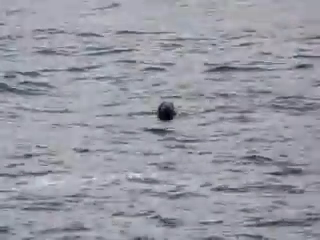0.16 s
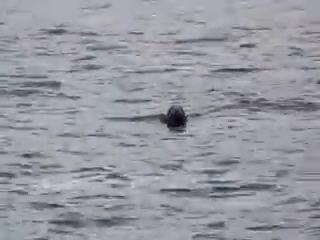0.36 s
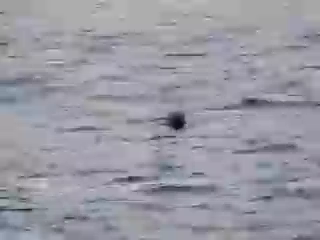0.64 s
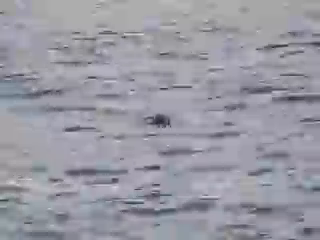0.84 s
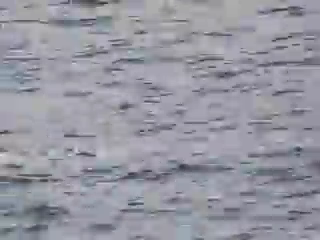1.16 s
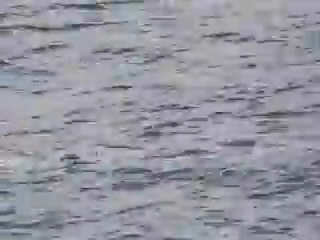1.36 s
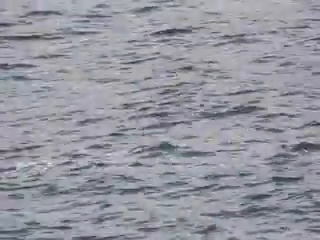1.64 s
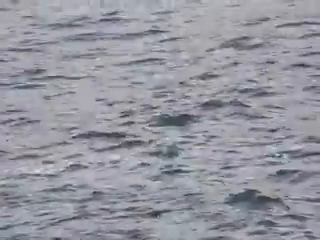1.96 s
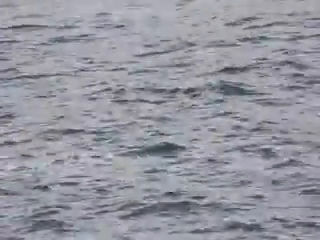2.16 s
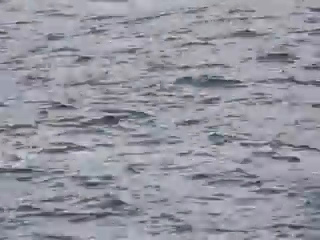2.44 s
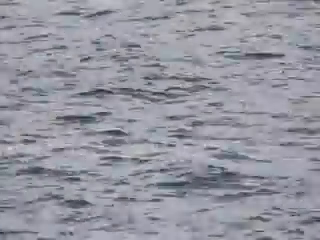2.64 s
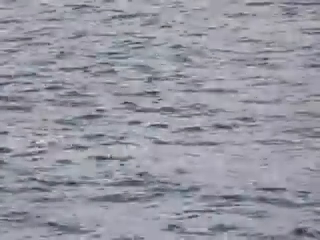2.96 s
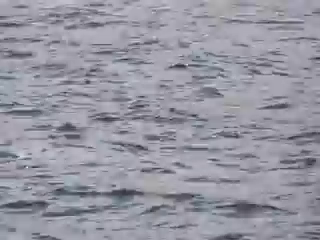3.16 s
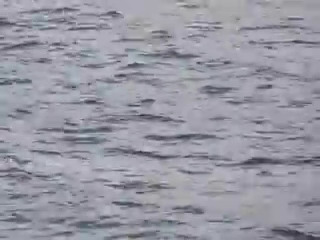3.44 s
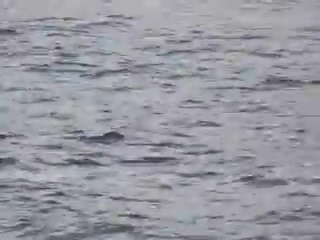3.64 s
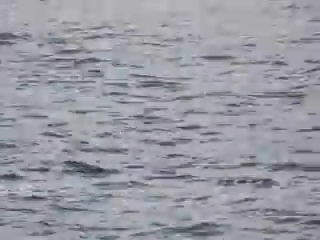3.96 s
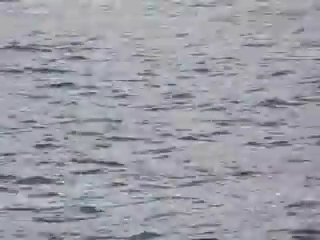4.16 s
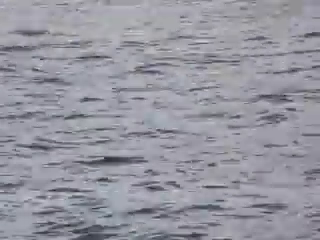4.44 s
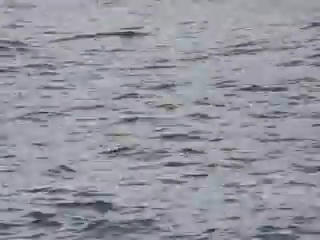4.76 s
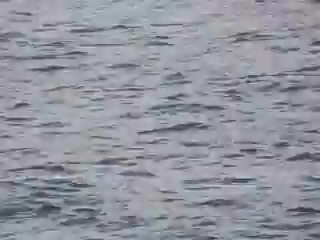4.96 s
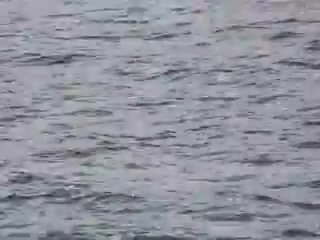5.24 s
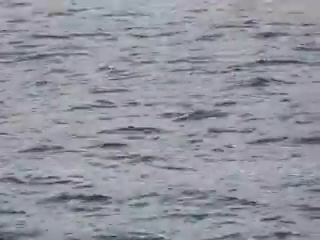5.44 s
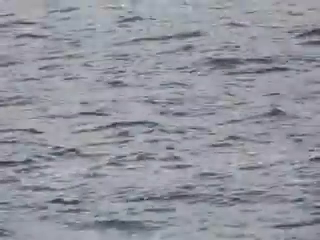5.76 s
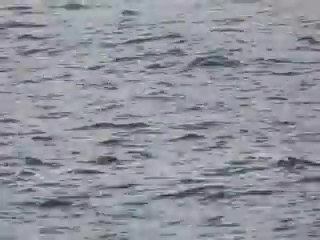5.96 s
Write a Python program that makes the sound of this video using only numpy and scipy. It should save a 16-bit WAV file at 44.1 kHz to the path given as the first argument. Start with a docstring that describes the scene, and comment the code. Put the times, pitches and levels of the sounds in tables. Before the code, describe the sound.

Countless seagulls call over one another at a windy shore, with low wind rumble and harsh buffeting bursts overloading the microphone.

```python
"""Choppy, rocky shore: a gull colony yelps, shrieks, mews and squawks over a distant chorus, in gusty wind.
Near calls are harmonic stacks on arched, sagging or straight pitch glides; all but squawks have a bounce.
The chorus is 420 overlapping yelps; coloured noise is the wash of small waves and blur of the farthest gulls.
Wind is shaped noise (rumble, flutter) plus pressure pulses and snaps; its hardest peaks overload the microphone.
Short noise bursts make a few faint ticks close by; a faint electronic whine sits on top."""
import sys
import numpy as np
from scipy import signal
from scipy.fft import rfft, irfft, next_fast_len
from scipy.io import wavfile
from scipy.ndimage import uniform_filter1d, map_coordinates

SR = 44100
rng = np.random.default_rng(int(sys.argv[2]) if len(sys.argv) > 2 else 0)


def waveform_to_disk(signal):
    """Save audio, clipped to [-1, 1], as 16-bit WAV at the path in sys.argv[1]."""
    frames = np.transpose(np.atleast_2d(signal))
    scaled = np.clip(frames, -1, 1) * 32767
    samples = np.round(scaled).astype(np.int16)
    wavfile.write(sys.argv[1], SR, samples)


N = 268965  # samples


def amp(db):
    """Decibels to gain."""
    return 10 ** (np.asarray(db) / 20)


def unit(x):
    """Scale to rms 1."""
    return x / np.sqrt(np.mean(x ** 2) + 1e-20)


def along(points, hz):
    """Interpolate (Hz, value) points on a log frequency axis."""
    point_hz, values = np.transpose(points)
    return np.interp(np.log(hz + 1), np.log(point_hz + 1), values)


def curves(rows):
    """One value per sample for each column after the time."""
    times_s, *columns = np.transpose(rows)
    return [np.interp(np.arange(N) / SR, times_s, column) for column in columns]


def wobble(rate_hz, size=N):
    """Smooth random curve through rate_hz random knots a second."""
    knots = rng.standard_normal(int(size * rate_hz / SR) + 4)
    return map_coordinates(knots, [np.arange(size) * rate_hz / SR])


def filtered(x, response):
    """Apply a gain that is a function of frequency."""
    size = next_fast_len(N + SR // 2)
    return irfft(rfft(x, size) * response(np.fft.rfftfreq(size, 1 / SR)), size)[:N]


def noise(spectrum):
    """Coloured noise of rms 1."""
    return unit(filtered(rng.standard_normal(N), lambda hz: amp(along(spectrum, hz))))


def evened(x, span_s):
    """Divide out the running rms over span_s, so strength holds steady."""
    power = uniform_filter1d(x ** 2, max(int(span_s * SR), 8))
    return x / np.sqrt(np.abs(power) + 1e-6)


def add(track, start_s, sound):
    """Mix a sound into the track in place, cropped at both ends."""
    start = int(start_s * SR)
    part = sound[max(-start, 0):max(N - start, 0)]
    track[max(start, 0):][:len(part)] += part


def cry(length_s, start_hz, middle_hz, end_hz, harmonics_db, jitter, flutter_db):
    """One syrinx note on a quadratic pitch glide; pitch trembles, turbulent air shakes each harmonic."""
    u = np.linspace(0, 1, max(int(length_s * SR), 64))
    glide_hz = np.polyval(np.polyfit([0, .5, 1], [start_hz, middle_hz, end_hz], 2), u)
    phase = 2 * np.pi * np.cumsum(glide_hz * (1 + jitter * wobble(258, len(u)))) / SR
    swell = np.abs(np.sin(np.pi * u)) ** 0.16
    partials = [amp(db + flutter_db * wobble(70, len(u))) * np.sin(k * phase)
                for k, db in enumerate(harmonics_db, 1)]
    return np.sqrt(2) * swell * sum(partials)


BOUNCE_MEAN_S, BOUNCE_DB = .012, -10


def note(length_s, hz, fall, arch, harmonics_db):
    """Near gull's note plus one bounce off water or rock, which beats against the gliding pitch."""
    start_hz, end_hz = hz * (1 - arch + fall / 2), hz * (1 - arch - fall / 2)
    direct = cry(length_s, start_hz, hz, end_hz, harmonics_db, jitter=.009, flutter_db=3)
    lag = int(SR * BOUNCE_MEAN_S * (.5 + rng.random()))
    return np.pad(direct, (0, lag)) + amp(BOUNCE_DB) * np.pad(direct, (lag, 0))


CALL_TRIM_DB = 1  # on yelps, long calls and shrieks
UPPER_STEP_DB = -22.5  # harmonics 4 and 5, each relative to the one below


def harmonic_calls(calls, arch):
    """Syrinx notes with three given harmonics and two weaker ones above."""
    out = np.zeros(N)
    for start_s, length_s, hz, fall, *levels_db in calls:
        third_db = levels_db[-1]
        levels_db = np.r_[levels_db, third_db + UPPER_STEP_DB, third_db + 2 * UPPER_STEP_DB]
        add(out, start_s, note(length_s, hz, fall, arch, levels_db + CALL_TRIM_DB))
    return out


# short, mostly falling yelps, plus the low tone of the hoarse squawk at 2.83 s
# and one high falling mew with a strong second harmonic at 4.6 s; levels before trims:
# (time [s], length [s], mid pitch [Hz], fall [share of pitch], harmonic 1 [dB], 2 [dB], 3 [dB])
YELP_CALLS = [(0.01, 0.055, 1208, 0.097, -38, -40, -48.0), (0.1, 0.054, 1445, 0.16, -56, -36, -43),
              (0.24, 0.035, 1214, 0.096, -50.0, -36.5, -44),
              (0.245, 0.04, 1570, 0.055, -59.0, -38.5, -59.0),
              (0.315, 0.047, 1175, 0.032, -34.0, -44.5, -53.0), (0.315, 0.045, 1384, 0.08, -43, -48, -43),
              (0.355, 0.035, 1483, 0.076, -38, -38, -50.5), (0.398, 0.043, 1430, 0.12, -53.0, -34.5, -44),
              (0.485, 0.062, 1270, 0.13, -48, -35.5, -43), (0.535, 0.06, 1357, 0.061, -37.5, -38, -51),
              (0.645, 0.04, 1215, 0.1, -34.5, -44, -50), (0.7, 0.05, 1422, 0.16, -48, -39, -45),
              (0.845, 0.053, 1339, 0.116, -33, -44, -47), (0.93, 0.079, 1227, 0.092, -38, -43, -41),
              (1.02, 0.049, 1415, 0.088, -37, -34, -42), (1.035, 0.037, 1168, 0.074, -37, -47, -40),
              (1.185, 0.064, 1348, 0.085, -38.5, -40, -47), (1.275, 0.028, 1140, 0.097, -35.5, -58, -55.5),
              (1.395, 0.06, 1280, 0.02, -45, -43, -43), (1.41, 0.052, 1493, 0.03, -46, -36, -51),
              (1.49, 0.029, 1246, 0.15, -31.5, -39, -43), (1.61, 0.035, 1216, 0.07, -46, -44, -46),
              (1.665, 0.082, 1256, 0.07, -37, -40, -50), (1.735, 0.05, 1350, 0.064, -37.0, -44, -54.0),
              (1.775, 0.059, 1193, 0.065, -37.5, -41, -44), (1.82, 0.025, 1520, 0.073, -45.5, -37.5, -60),
              (1.98, 0.067, 1360, 0.074, -38, -37.5, -54.0), (2.085, 0.068, 1266, 0.17, -31, -46, -42),
              (2.255, 0.064, 1370, 0.14, -48.5, -37.0, -51), (2.3, 0.085, 1334, 0.086, -36, -48, -46),
              (2.4, 0.056, 1328, 0.082, -38.0, -39, -43.5), (2.455, 0.052, 1206, 0.106, -35.5, -46, -48.0),
              (2.535, 0.052, 1410, 0.15, -45, -37.0, -57.5), (2.705, 0.059, 1360, 0.05, -36.5, -40, -42.0),
              (2.83, 0.062, 732, 0.28, -35, -47, -46.0), (2.865, 0.035, 1420, 0.035, -44, -48, -40),
              (2.97, 0.055, 1432, 0.12, -37.5, -36.0, -49.0), (3.095, 0.07, 1333, 0.14, -38, -37, -46),
              (3.11, 0.089, 1372, 0.06, -42, -39.0, -40.0), (3.205, 0.059, 1523, 0.091, -58, -37, -56),
              (3.31, 0.05, 1374, 0.022, -39, -37, -49.5), (3.375, 0.053, 1394, 0.13, -36.5, -31, -42),
              (3.425, 0.077, 1380, 0.092, -41.5, -35, -39.5), (3.485, 0.06, 1401, 0.089, -41.5, -36.0, -46),
              (3.5, 0.056, 1283, 0.12, -32.5, -41, -36), (3.53, 0.033, 1087, 0.089, -41, -37.0, -41.5),
              (3.545, 0.045, 1365, 0.055, -44, -46, -39), (3.605, 0.04, 1583, 0.022, -52, -44, -56.5),
              (3.655, 0.065, 1377, 0.144, -42.0, -33, -51.0), (3.7, 0.085, 1390, 0.07, -38, -39, -41),
              (3.945, 0.076, 1354, 0.131, -41, -32, -40.5), (3.995, 0.043, 1260, 0.09, -37, -41, -47.0),
              (4.055, 0.08, 1470, -0.014, -46, -33, -57.5), (4.155, 0.056, 1460, 0.005, -39, -36.5, -59.5),
              (4.25, 0.046, 1504, 0.005, -55.5, -35.5, -47),
              (4.265, 0.047, 1360, 0.066, -38.5, -31.5, -37.5), (4.345, 0.037, 1298, 0.023, -31, -37, -40),
              (4.475, 0.052, 1578, 0.096, -57, -38, -63), (4.525, 0.05, 1374, 0.062, -39, -42, -40),
              (4.605, 0.11, 2115, 0.115, -40.5, -42, -62), (4.645, 0.09, 1322, 0.05, -38, -38, -44),
              (4.84, 0.06, 1435, 0.153, -43.0, -35.5, -45.0), (4.89, 0.079, 1334, 0.065, -46, -36.5, -48),
              (5.035, 0.06, 1598, 0.094, -57, -38, -62), (5.05, 0.033, 1410, 0.132, -49, -36, -40.5),
              (5.08, 0.037, 1247, 0.076, -34, -49, -58.0), (5.355, 0.05, 1489, 0.042, -41.5, -34.5, -52.0),
              (5.42, 0.055, 1370, 0.085, -39, -36.5, -42), (5.555, 0.047, 1492, 0.044, -39.5, -35, -44),
              (5.62, 0.05, 1334, 0.018, -36, -43, -41), (5.74, 0.07, 1370, 0.058, -37, -35.5, -43),
              (5.785, 0.068, 1276, 0.15, -35.5, -41, -38.5), (5.97, 0.08, 1327, 0.098, -36.5, -36, -38.5)]
CALL_ARCH = .014  # mid-note bulge above a straight glide [share of pitch]; also for mews


def yelps():
    """Syrinx notes whose pitch bulges slightly midway: yelps, one low squawk tone and one high mew."""
    return harmonic_calls(YELP_CALLS, CALL_ARCH)


# arched long-call notes; levels before trims:
# (time [s], length [s], mid pitch [Hz], fall [share of pitch], harmonic 1 [dB], 2 [dB], 3 [dB])
LONG_CALL_NOTES = [(0.91, 0.078, 1590, 0.064, -49, -40.5, -49),
                   (1.255, 0.066, 1557, 0.047, -49, -36.5, -56), (1.4, 0.12, 1581, 0.16, -45.0, -34, -59),
                   (1.51, 0.08, 1608, 0.061, -58.0, -36.5, -46),
                   (2.16, 0.052, 1620, 0.00024, -44.0, -37.0, -60.5),
                   (2.58, 0.11, 1629, 0.00084, -40.0, -46, -50), (3.75, 0.11, 1560, 0.12, -56, -34.5, -49),
                   (4.06, 0.1, 1595, 0.04, -37.5, -37, -56.0), (4.87, 0.11, 1566, -0.005, -39, -38.5, -57),
                   (5.19, 0.088, 1585, -0.028, -39.5, -47.0, -56),
                   (5.49, 0.089, 1556, 0.048, -40, -35, -52),
                   (5.835, 0.075, 1565, 0.053, -41.5, -34.5, -60)]
LONG_CALL_ARCH = 0.045  # [share of pitch]


def long_calls():
    """Series of syrinx notes that rise to mid-note and fall again."""
    return harmonic_calls(LONG_CALL_NOTES, LONG_CALL_ARCH)


# shrill shrieks; levels before trims:
# (time [s], length [s], mid pitch [Hz], fall [share of pitch], level [dB])
SHRIEK_CALLS = [(0.021, 0.028, 1234, 0.098, -42), (0.076, 0.073, 1148, 0.145, -36),
                (0.373, 0.031, 1099, 0.096, -36.5), (0.783, 0.048, 1163, 0.098, -34.5),
                (1.05, 0.069, 1166, 0.013, -38.5), (1.47, 0.031, 1123, 0.002, -40),
                (1.514, 0.024, 1116, 0.054, -34), (1.595, 0.072, 1143, 0.115, -34.5),
                (2.65, 0.024, 1164, 0.056, -37), (2.894, 0.035, 1139, 0.144, -31),
                (3.173, 0.042, 1078, 0.12, -33), (3.416, 0.046, 1091, 0.16, -30),
                (4.058, 0.03, 1150, 0.11, -32), (4.097, 0.022, 1111, 0.094, -31.5),
                (4.341, 0.075, 1231, 0.137, -36), (4.694, 0.028, 1121, 0.048, -33.5),
                (4.755, 0.051, 1174, 0.064, -34), (4.975, 0.04, 1154, 0.125, -35.5),
                (5.08, 0.028, 1163, 0.018, -38), (5.288, 0.038, 1144, 0.052, -32),
                (5.46, 0.036, 1164, 0.086, -35), (5.598, 0.049, 1124, 0.12, -31)]
# harmonics 1-4, the third carries the cry: (level [dB re shriek level])
SHRIEK_PARTIALS_DB = [-8.5, -15, 0.5, -18.5]
SHRIEK_SCOOP = 0.012  # mid-note sag below a straight glide [share of pitch]


def shrieks():
    """Third-harmonic-heavy notes on a pitch glide that sags midway."""
    out = np.zeros(N)
    for start_s, length_s, hz, fall, level_db in SHRIEK_CALLS:
        levels_db = level_db + CALL_TRIM_DB + np.array(SHRIEK_PARTIALS_DB)
        add(out, start_s, note(length_s, hz, fall, -SHRIEK_SCOOP, levels_db))
    return out


# high, nearly level mews and one drawn-out wail; levels before trims:
# (time [s], length [s], mid pitch [Hz], fall [share of pitch], level [dB])
MEW_CALLS = [(0.0, 0.15, 1760, 0.044, -44.5), (0.277, 0.16, 1813, 0.044, -44.5),
             (0.57, 0.13, 1810, 0.058, -46.5), (0.84, 0.145, 1830, 0.059, -45.0),
             (1.123, 0.125, 1840, 0.063, -45), (1.382, 0.13, 2070, 0.009, -43),
             (2.15, 0.053, 1750, 0.066, -44), (2.479, 0.4, 1912, -0.058, -43.0),
             (2.764, 0.1, 1595, -0.017, -38), (3.105, 0.17, 2022, 0.05, -43),
             (3.388, 0.11, 2080, 0.06, -43), (3.82, 0.059, 2014, 0.039, -43),
             (4.019, 0.16, 2058, -0.034, -41.5), (4.292, 0.11, 2072, 0.033, -41.5)]
MEW_TRIM_DB, MEW_SECOND_HARMONIC_DB = 1.2, -8.5  # second harmonic re first


def mews():
    """Nearly pure tones: a fundamental and a weaker second harmonic."""
    out = np.zeros(N)
    for start_s, length_s, hz, fall, level_db in MEW_CALLS:
        first_db = level_db + MEW_TRIM_DB
        levels_db = [first_db, first_db + MEW_SECOND_HARMONIC_DB]
        add(out, start_s, note(length_s, hz, fall, CALL_ARCH, levels_db))
    return out


# hoarse squawks, far below the usual pitch; levels before formant and trim:
# (time [s], length [s], start pitch [Hz], end pitch [Hz], level [dB])
SQUAWK_CALLS = [(1.398, 0.13, 298, 270.4, -51), (2.809, 0.078, 277.2, 249, -35)]
# resonance of the wide-open bill: (frequency [Hz], gain [dB])
OPEN_BILL = [(300, -17.5), (700, -9), (1300, -6.5), (2000, -8), (2700, -15.5), (3200, -2), (3600, 4.5),
             (3950, -5), (4400, -19), (5500, -32.5)]


def squawks(harmonic_count=20):
    """Syrinx drops into a slow rattle whose close harmonics fill the bill resonance."""
    out = np.zeros(N)
    for start_s, length_s, start_hz, end_hz, level_db in SQUAWK_CALLS:
        middle_hz = (start_hz + end_hz) / 2
        levels_db = level_db + along(OPEN_BILL, middle_hz * np.arange(1, harmonic_count + 1))
        squawk = cry(length_s, start_hz, middle_hz, end_hz, levels_db, jitter=.018, flutter_db=4.5)
        add(out, start_s, squawk)
    return out


# echo off the shore: (frequency [Hz], t60 [s])
SHORE_DECAY = [(500, 0.91), (3000, 1), (8000, 0.36)]


def shore(x):
    """Diffuse echo from rocks and water: unit-energy noise tail, treble dies first."""
    hz, t, bins = signal.stft(rng.standard_normal(SR), SR, nperseg=256)
    decay = amp(-60 * t / along(SHORE_DECAY, hz)[:, None])
    tail = signal.istft(bins * decay, SR, nperseg=256)[1]
    return signal.fftconvolve(x, tail / np.linalg.norm(tail))[:N]


# far gull's throat resonance: (frequency [Hz], gain [dB])
FAR_THROAT = [(900, -6), (1100, 3.5), (1300, 5), (1450, 1.5), (1700, -18.5), (2050, 4.5), (2250, -7.5),
              (2400, -3.5), (2700, 7), (3200, 5), (3700, -4), (4150, 0.5), (4500, -12), (5500, -28),
              (8000, -38.5)]


def far_gulls(count=420):
    """Overlapping four-harmonic yelps, each dropping in pitch."""
    out = np.zeros(N)
    starts_s = (np.arange(count) + rng.random(count)) / count * (N / SR + .1) - .1
    traits = rng.standard_normal((count, 4))
    for start_s, (pitch, stretch, drop, loudness) in zip(starts_s, traits):
        hz = 1305 * np.exp(.112 * pitch)
        levels_db = along(FAR_THROAT, hz * np.arange(1, 5)) + 1.2 * loudness
        length_s = .07 * np.exp(.25 * stretch)
        fall = np.exp(-.07 + .035 * drop)  # end pitch / mid pitch
        yelp = cry(length_s, hz * fall ** (-1 / 2), hz, hz * fall, levels_db, jitter=.009, flutter_db=3)
        add(out, start_s, yelp)
    return out


# distant chorus; levels before trims: (time [s], fundamentals [dB], overtones [dB])
CHORUS_LEVELS = [(0, -33, -32.5), (.4, -33, -29.5), (1.1, -33.5, -34), (1.9, -34, -31.5), (2.6, -31.5, -31),
                 (3.5, -31, -29), (4.6, -31.5, -28.5), (5.4, -32, -29), (6.1, -32.5, -32)]
CHORUS_TRIM_DB, OVERTONE_TRIM_DB = -1.46, -3


def colony():
    """Far chorus blurred by the shore, split near 1900 Hz into bands that follow their own levels."""
    voices = far_gulls()
    voices = voices + amp(-5.5) * shore(voices)
    fundamentals = filtered(voices, lambda hz: 1 / (1 + (hz / 1900) ** 12))
    overtones = voices - fundamentals
    level_db, overtone_db = curves(CHORUS_LEVELS)
    low = amp(level_db + CHORUS_TRIM_DB) * evened(fundamentals, 0.13)
    return low + amp(overtone_db + OVERTONE_TRIM_DB) * evened(overtones, 0.11)


GUST_ATTACK_S, GUST_RELEASE_S, GUST_SAG_DB_PER_S = 0.016, 0.013, 4


def gust(start_s, length_s):
    """Gust envelope: quick linear rise, slow sag, exponential release."""
    t = np.maximum(np.arange(N) / SR - start_s, 0)
    rise = np.minimum(t / GUST_ATTACK_S, 1)
    release = np.exp(-np.maximum(t - length_s, 0) / GUST_RELEASE_S)
    return rise * amp(-GUST_SAG_DB_PER_S * t) * release


# wind between gusts, before trims: (time [s], rumble strength [dB])
STEADY_WIND = [(0, -19), (.9, -19.5), (1.75, -13.5), (2.6, -19.5), (3.5, -19), (4.35, -20), (5.2, -14.5),
               (6.1, -13.5)]
BREEZE_FLUTTER_DB = -8.5  # re breeze rumble
# gusts, before trims: (time [s], length [s], rumble [dB], flutter [dB])
WIND_GUSTS = [(0.083, 0.19, -14.5, -18.5), (0.296, 0.057, -20, -18), (0.481, 0.1, -14, -20.5),
              (0.773, 0.076, -26, -18.5), (1.307, 0.28, -10.5, -14), (1.648, 0.087, -30, -14.5),
              (1.798, 0.15, -21, -15), (2.044, 0.23, -12, -14.5), (2.237, 0.16, -10.5, -22.5),
              (2.586, 0.038, -8.5, -20.5), (2.921, 0.098, -22, -17.5), (3.12, 0.068, -11.5, -12.5),
              (3.204, 0.057, -12, -13), (3.361, 0.14, -14.5, -21.5), (4.25, 0.28, -18, -23),
              (4.528, 0.077, -15, -14.5), (4.728, 0.052, -20, -18.5), (5.011, 0.21, -13.5, -15.5),
              (5.27, 0.085, -12, -9.5), (5.348, 0.071, -11, -14.5), (5.574, 0.038, -14, -12.5),
              (5.704, 0.29, -28, -16.5), (5.882, 0.063, -8, -10.5), (5.999, 0.087, -13, -14.5)]


def wind_strength():
    """Rumble and flutter levels in dB: gusts add their power to the breeze."""
    breeze_db, = curves(STEADY_WIND)
    power = amp(np.array([breeze_db, breeze_db + BREEZE_FLUTTER_DB])) ** 2
    for start_s, length_s, rumble_db, flutter_db in WIND_GUSTS:
        power += np.outer(amp([rumble_db, flutter_db]), gust(start_s, length_s)) ** 2
    return 10 * np.log10(power)


# slow pressure swings: (frequency [Hz], relative density [dB])
RUMBLE_SPECTRUM = [(8, -15.5), (20, 0.5), (33, 1), (60, 0), (100, -4), (150, -15.5), (250, -20.5),
                   (500, -42.5), (1500, -75)]
# ragged flutter: (frequency [Hz], relative density [dB])
FLUTTER_SPECTRUM = [(50, -14.5), (110, 3.5), (170, 0), (300, -8.5), (500, -16.5), (900, -34), (2000, -52),
                    (5000, -42.5), (8000, -57)]


def wind(hardening_db_per_db=0.099, unrest_db=1):
    """Slow pressure swings carry a ragged flutter, harsher the harder it blows."""
    rumble_db, flutter_db = wind_strength() + unrest_db * wobble(16)
    rumble = amp(rumble_db - 1.5) * evened(noise(RUMBLE_SPECTRUM), 0.089)
    flutter = evened(noise(FLUTTER_SPECTRUM) * amp(7.2 * wobble(110)), .05)
    harsh = filtered(flutter, lambda hz: hz ** 4 / (hz ** 4 + 450 ** 4))
    # faster air sheds smaller eddies: the upper part grows faster than the rest
    harsh_gain = amp(hardening_db_per_db * (flutter_db + 20.0))
    return rumble + amp(flutter_db - 3.5) * (flutter - harsh + harsh_gain * harsh)


# hardest eddies striking the microphone; levels before trims:
# (time [s], kick peak [dB], kick width [s], crackle [dB])
EDDY_KICKS = [(.107, -6, 0.0011, -18), (.153, -2.5, 0.0019, -14), (.206, -10, 0.0014, -31),
              (.494, -10, 0.001, -26), (.541, -7, 0.0028, -22.5), (1.359, -11.5, 0.0013, -17),
              (1.376, -7, 0.0016, -18), (1.416, 0, 0.0024, -16.5), (1.484, -6.5, 0.0013, -12.5),
              (1.547, -3.5, 0.0017, -25), (1.567, -0.5, 0.0012, -21), (1.749, -8, 0.0011, -26),
              (1.821, -3.5, 0.0015, -21), (1.928, -1, 0.0014, -18.5), (2.066, -15, 0.0008, -13.5),
              (2.094, -10.5, 0.001, -18), (2.115, -9, 0.001, -22), (2.161, -8.5, 0.0007, -26),
              (2.192, -4, 0.002, -21), (2.222, -11.5, .0007, -20), (2.239, -11, 0.00096, -26),
              (2.265, 1, 0.00095, -22), (2.298, -10, 0.0014, -26), (2.39, -2.5, 0.0016, -37),
              (2.61, -3, 0.0017, -39), (2.832, -6, 0.002, -32), (2.995, 0.5, 0.005, -17.5),
              (3.158, -4, 0.0022, -11), (3.171, -5.5, 0.00064, -14.5), (3.228, -4.5, .0018, -27),
              (3.251, 0.5, .0017, -24), (3.258, -3.5, .0012, -22), (3.392, -7, 0.0033, -34),
              (4.569, -4, 0.0024, -37), (4.595, -19, 0.0012, -33), (4.611, -11.5, 0.00077, -36),
              (5.064, -5.5, 0.00076, -22), (5.162, -5, 0.00084, -17.5), (5.271, -3, 0.00099, -8),
              (5.28, 4.5, 0.0017, -24), (5.298, -1, 0.0011, -12), (5.327, -2, 0.00077, -9),
              (5.403, 0, 0.0019, -17.5), (5.599, -10.5, 0.00072, -20), (5.695, -4, 0.0015, -23),
              (5.744, -4.5, 0.00081, -23), (5.804, -6, 0.00082, -22), (5.913, 1, 0.0012, -18),
              (5.926, 0.5, 0.0013, -12.5), (5.938, -4, 0.00072, -21), (6.043, -0.5, 0.0014, -11),
              (6.089, -13, 0.00095, -20)]
# torn air: (frequency [Hz], relative density [dB])
CRACKLE_SPECTRUM = [(150, -22), (350, 2.5), (600, 0.5), (1000, -10.5), (2000, -22.5), (8000, -44.5)]


def eddies(front=0.84, kick_db=-1, crackle_db=-3, crackle_rise_s=.0015, crackle_fall_s=0.007):
    """Eddy thumps: suction, steep push, suction, with a crackle of torn air peaking before the crest."""
    out, crackle_level = np.zeros(N), np.zeros(N)
    t = np.arange(-SR // 50, SR // 50) / SR
    for time_s, peak_db, width_s, torn_db in EDDY_KICKS:
        u = t / (width_s * np.where(t < 0, front, 1))  # rise shorter than fall
        kick = (1 - u ** 2) * np.exp(-u ** 2 / 2)
        add(out, time_s + t[0], amp(peak_db + kick_db) * kick)
        since_front = t + width_s
        burst = np.exp(np.minimum(since_front / crackle_rise_s, -since_front / crackle_fall_s))
        add(crackle_level, time_s + t[0], amp(torn_db + crackle_db) * burst)
    return out + crackle_level * evened(noise(CRACKLE_SPECTRUM), 0.0091)


# sharp snaps of air at the microphone port: (time [s], level [dB])
PORT_SNAPS = [(.19, -18), (.345, -21), (1.355, -17), (1.3756, -12), (1.4837, -6.5), (2.942, -16.5),
              (5.1615, -14), (5.2695, -4.5), (5.274, -8), (5.291, -13), (5.309, -18), (5.322, -12),
              (5.331, -13), (5.632, -26), (5.924, -15)]


def snaps(front_s=0.00013, fall_s=0.00082):
    """Air tears off the port edge: a steep pressure step that relaxes at once."""
    out, t = np.zeros(N), np.arange(-SR // 100, SR // 100) / SR
    for time_s, level_db in PORT_SNAPS:
        add(out, time_s + t[0], amp(level_db) * np.tanh(t / front_s) / np.cosh(t / fall_s))
    return out


# faint ticks close by: (time [s], level [dB before trim and filter])
NEAR_TICKS = [(0.239, -35), (0.332, -38), (0.387, -32), (0.4329, -35), (1.0223, -34), (1.8451, -36),
              (2.749, -33), (3.415, -29.5), (4.119, -31), (4.3316, -31)]


def ticks(t60_s=0.0097, dull_hz=6500):
    """Tiny dry clicks: fast-decaying noise, band-limited."""
    out, t = np.zeros(N), np.arange(SR // 100) / SR
    for time_s, level_db in NEAR_TICKS:
        add(out, time_s, amp(level_db + 11 - 60 * t / t60_s) * rng.standard_normal(len(t)))
    return filtered(out, lambda hz: hz ** 2 / (hz ** 2 + 1800 ** 2) / (1 + (hz / dull_hz) ** 2))


# steady wash: small waves and, near 3500 Hz, the blur of the farthest gulls:
# (frequency [Hz], relative density [dB])
WASH_SPECTRUM = [(100, -11.5), (400, -1.5), (900, -3), (1800, -6), (3500, 0.5), (5000, -16.5),
                 (6500, -22.5), (8300, -33.5), (10000, -69.5)]


def sea_and_gull_blur():
    """Steady wash of small waves and the farthest gulls' blur: coloured noise with slight level drift."""
    level_db = -33.5 + 1.1 * wobble(2.0) + 1.5 * wobble(8.4)
    return amp(level_db) * noise(WASH_SPECTRUM)


NEAR_TRIM_DB, NEAR_ECHO_DB = -0.22, -15


def scene():
    """Near gulls with shore echo, chorus, steady wash, ticks, and wind at the microphone."""
    gulls = amp(NEAR_TRIM_DB) * (yelps() + long_calls() + shrieks() + mews() + squawks())
    birds = gulls + amp(NEAR_ECHO_DB) * shore(gulls) + colony()
    air = wind() + eddies() + snaps()
    return (birds + air + ticks() + sea_and_gull_blur())[None]


# faint electronic whine, level before its wobble: (frequency [Hz], level [dB])
ELECTRONIC_WHINE = [(9647, -83), (11025, -77.5)]
TOP_HZ, LIMIT_HZ = 8900, 15760  # steep treble roll-off; final cutoff


def record(dry):
    """Overload rounds off the strongest peaks; the camera is dull at the top and whines faintly."""
    clipped = dry[0] / (1 + np.abs(dry[0]) ** 10) ** (1 / 10)
    dull = filtered(clipped, lambda hz: 1 / np.sqrt(1 + (hz / TOP_HZ) ** 60))
    t = np.arange(N) / SR
    whine = sum(np.sqrt(2) * amp(level_db + wobble(15)) * np.sin(2 * np.pi * hz * t)
                for hz, level_db in ELECTRONIC_WHINE)
    return filtered(dull + whine, lambda hz: hz < LIMIT_HZ)[None]


dry = scene()
out = record(dry)
waveform_to_disk(out)
```